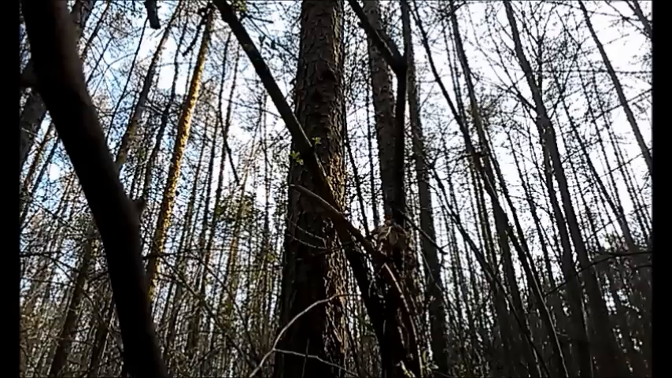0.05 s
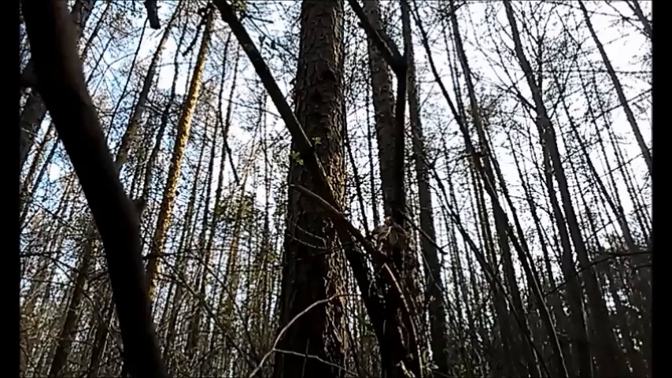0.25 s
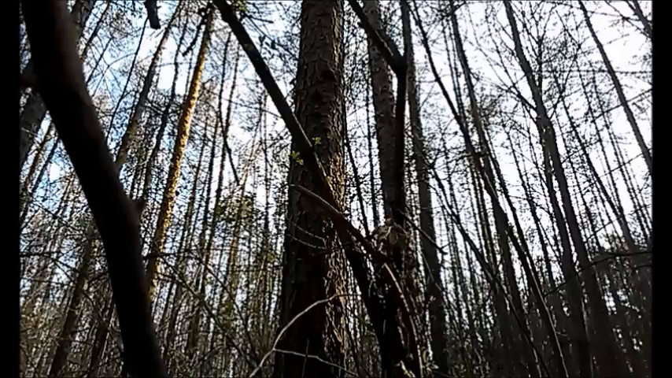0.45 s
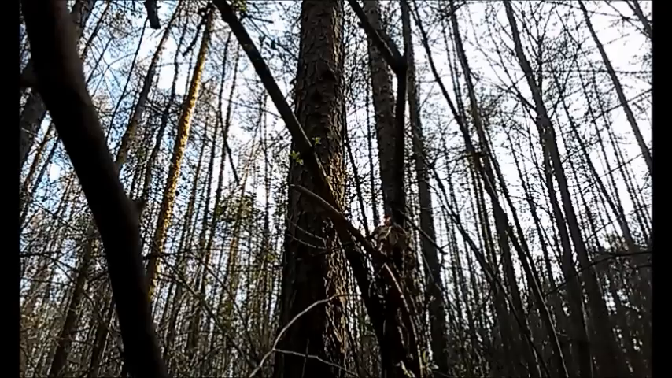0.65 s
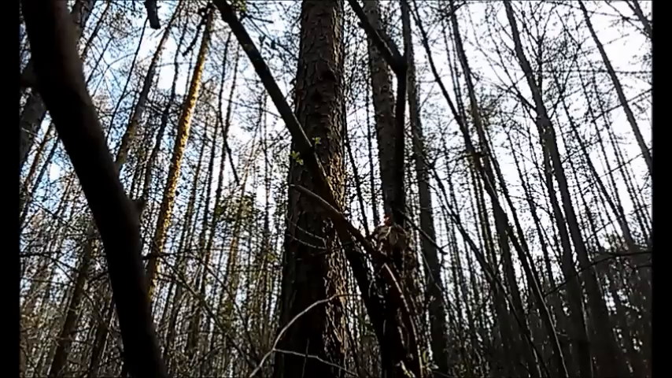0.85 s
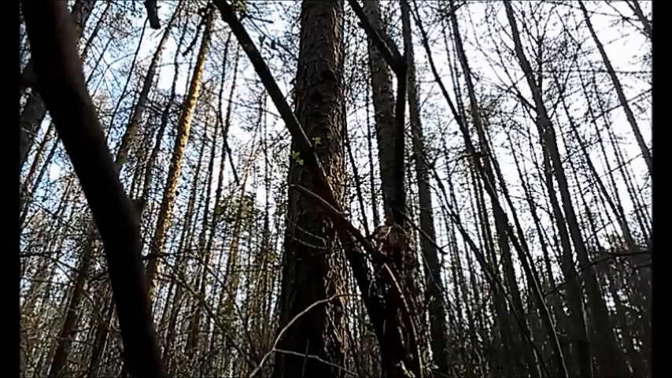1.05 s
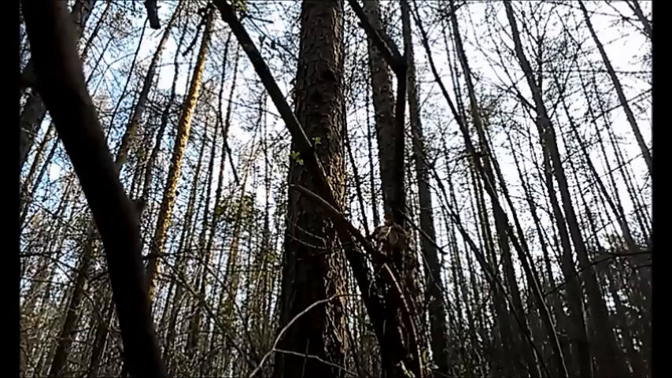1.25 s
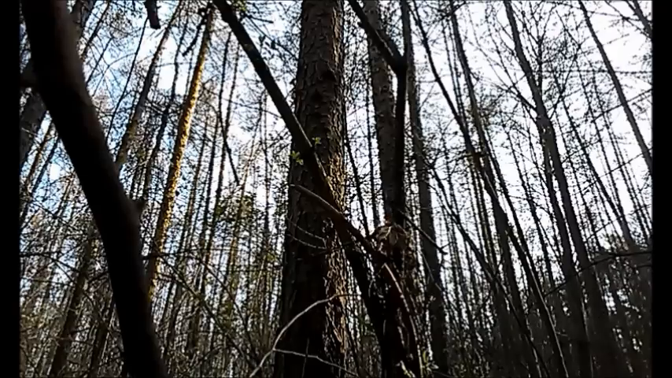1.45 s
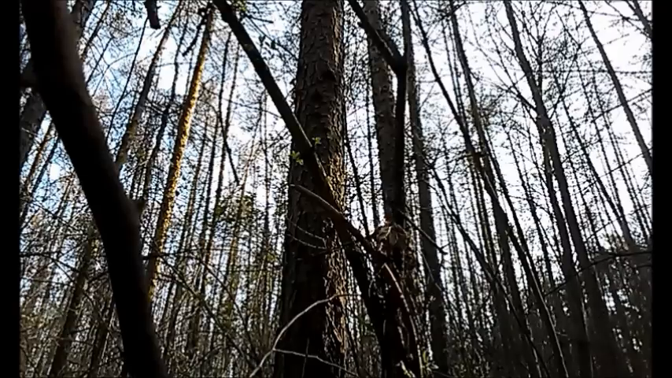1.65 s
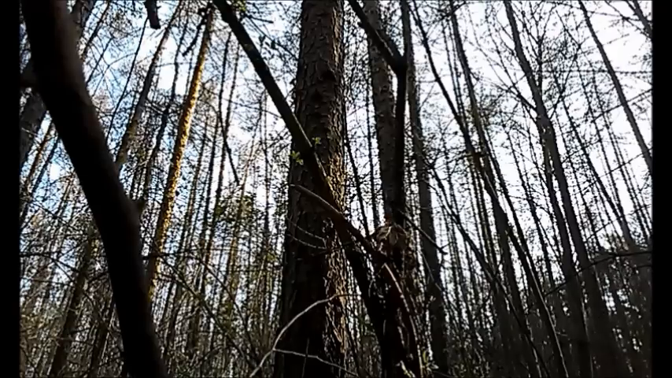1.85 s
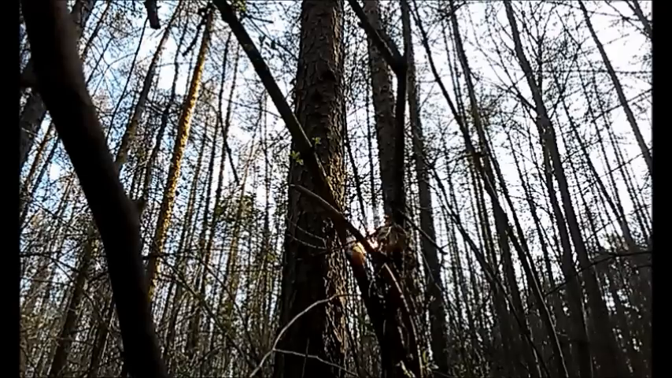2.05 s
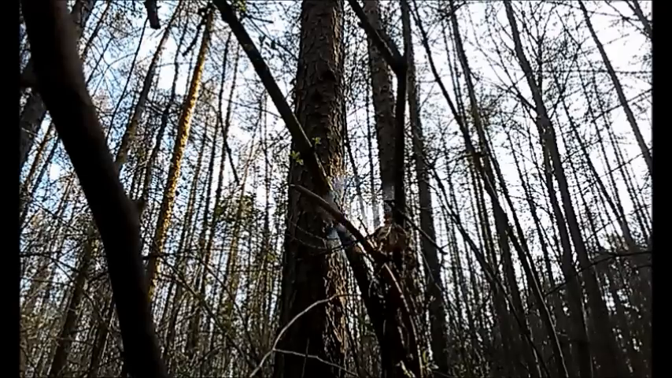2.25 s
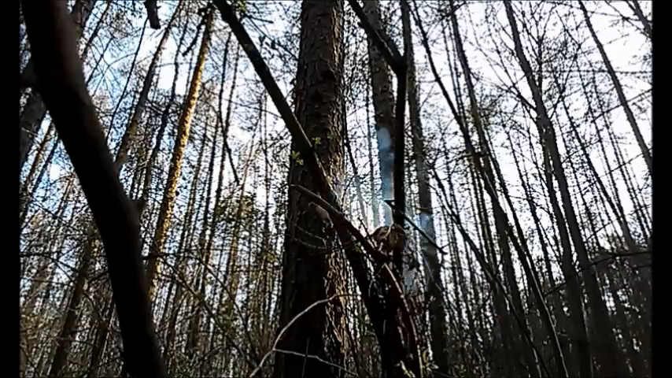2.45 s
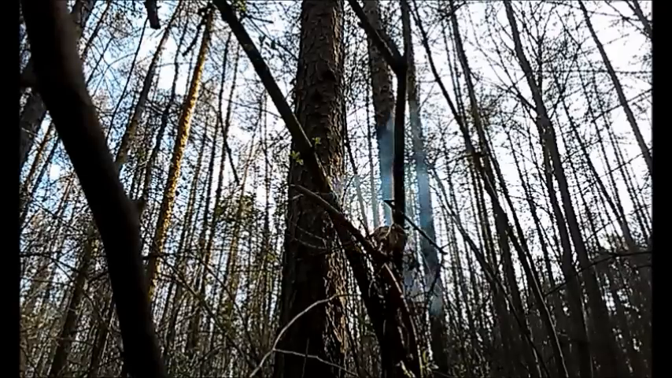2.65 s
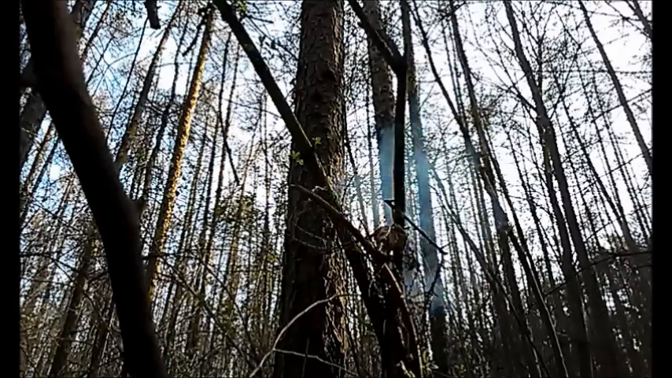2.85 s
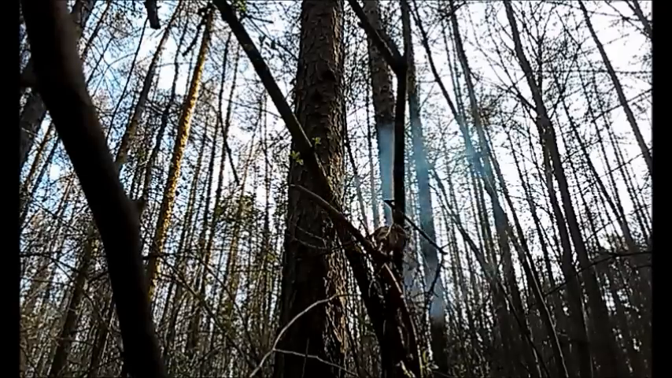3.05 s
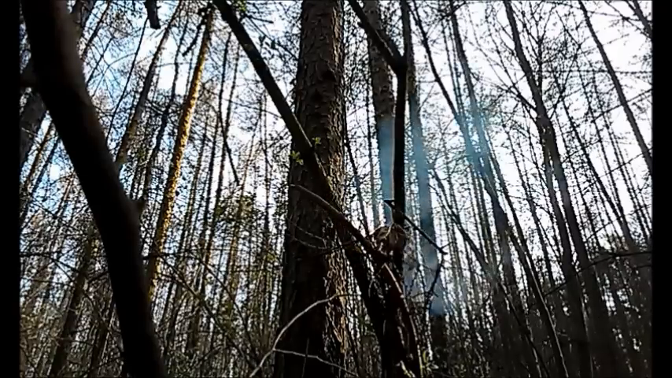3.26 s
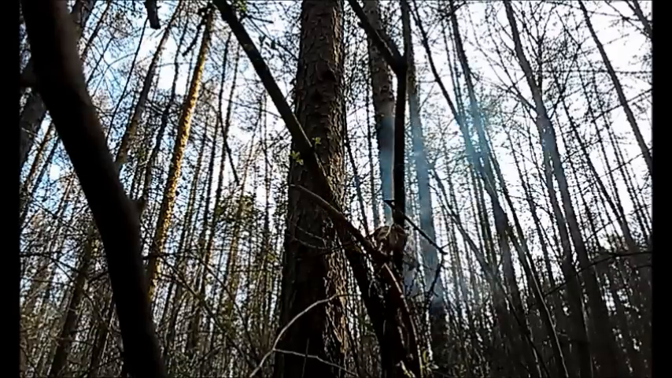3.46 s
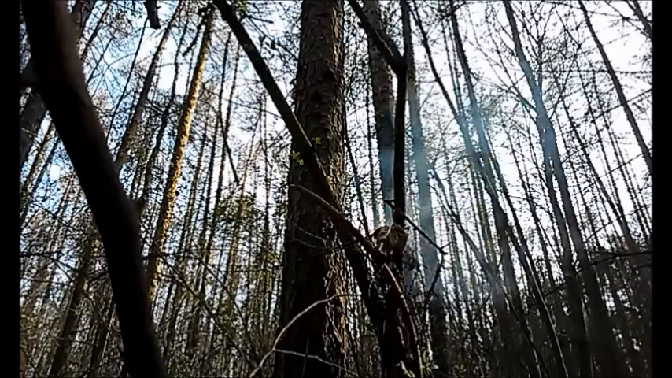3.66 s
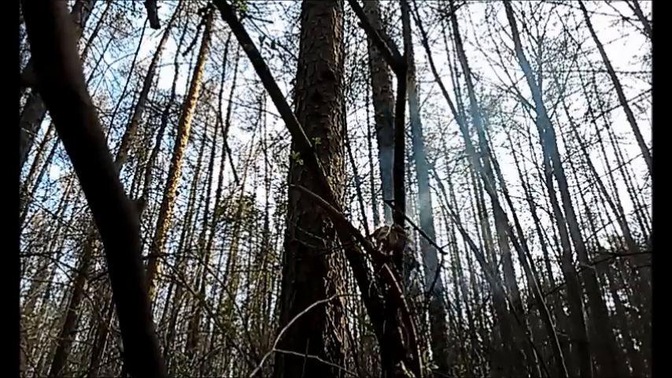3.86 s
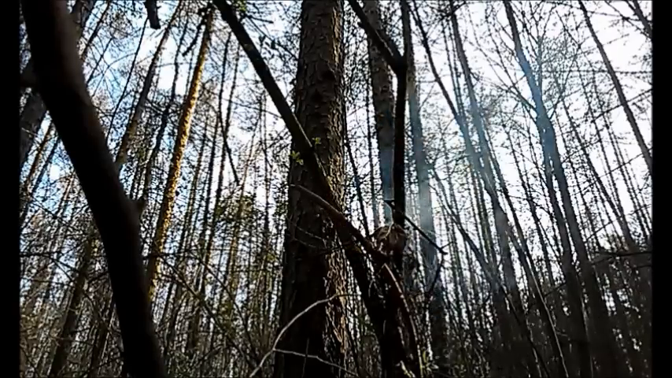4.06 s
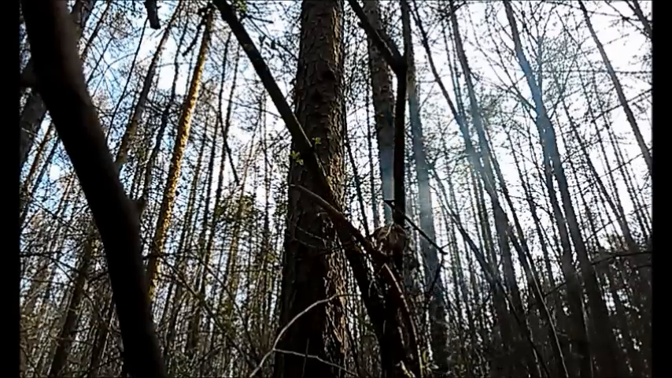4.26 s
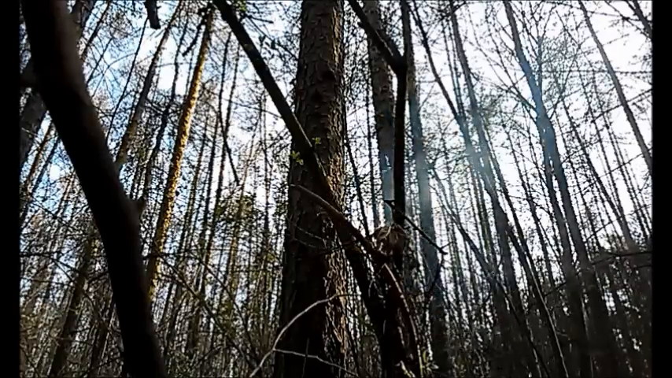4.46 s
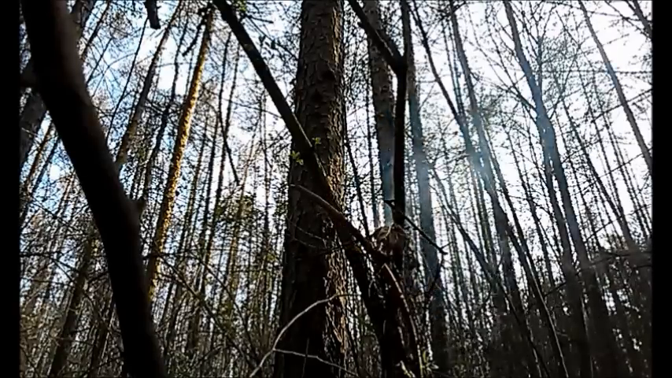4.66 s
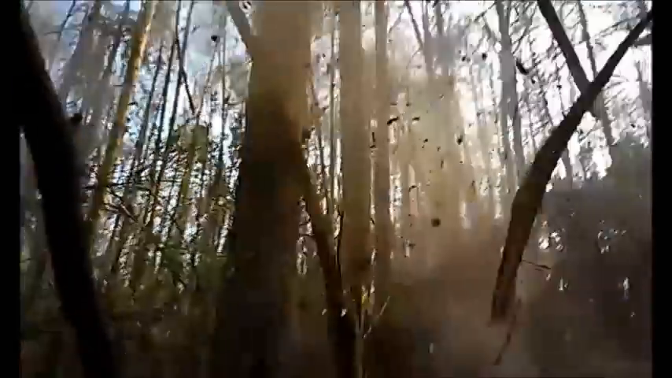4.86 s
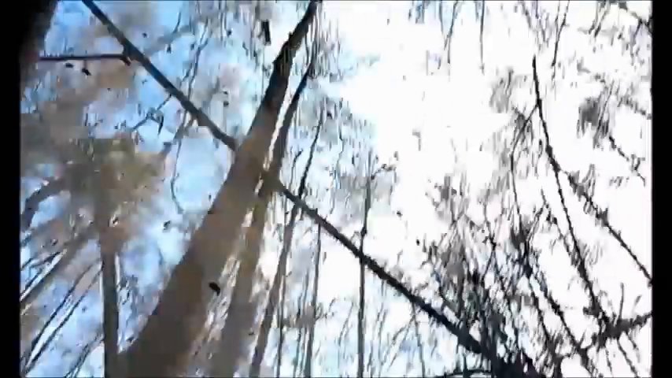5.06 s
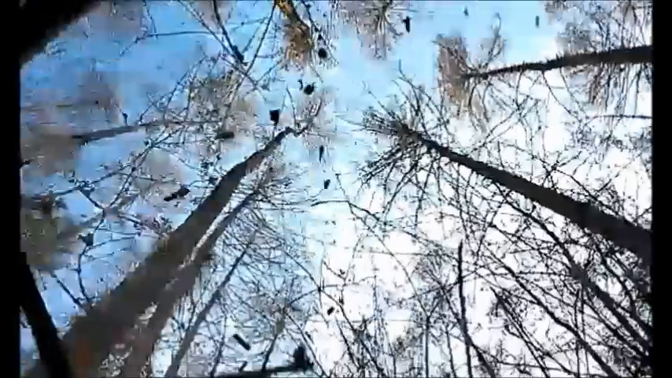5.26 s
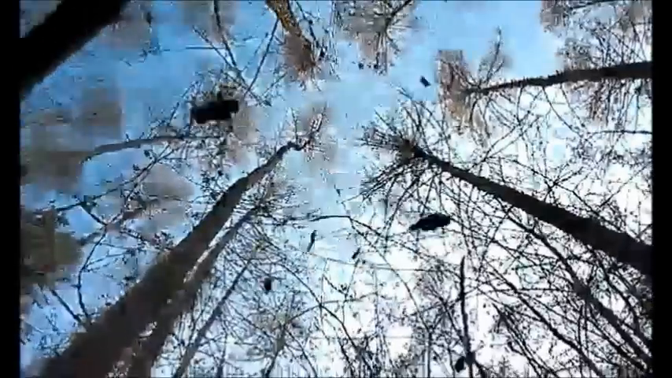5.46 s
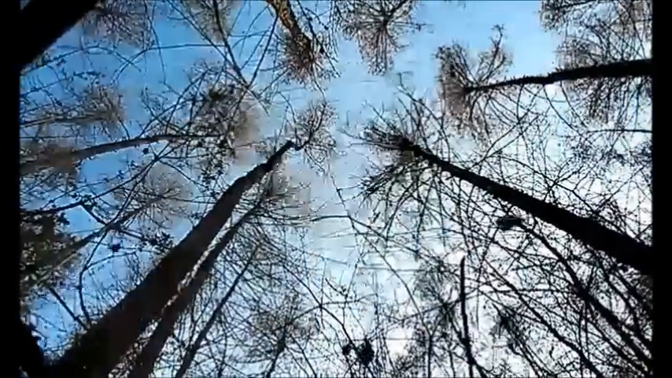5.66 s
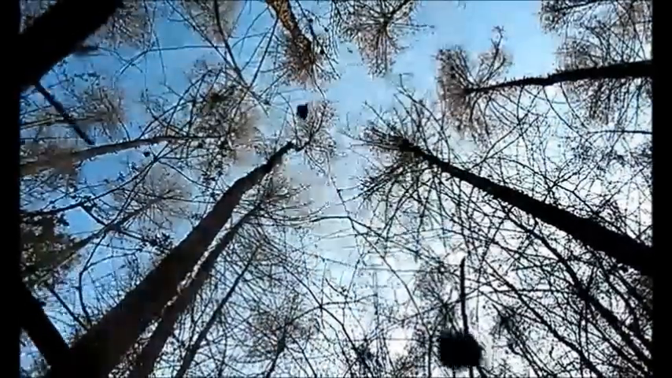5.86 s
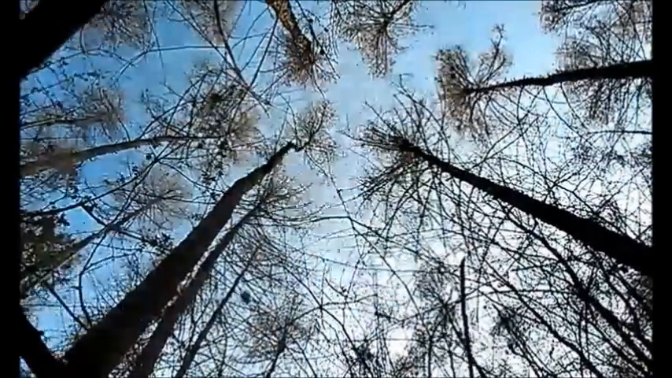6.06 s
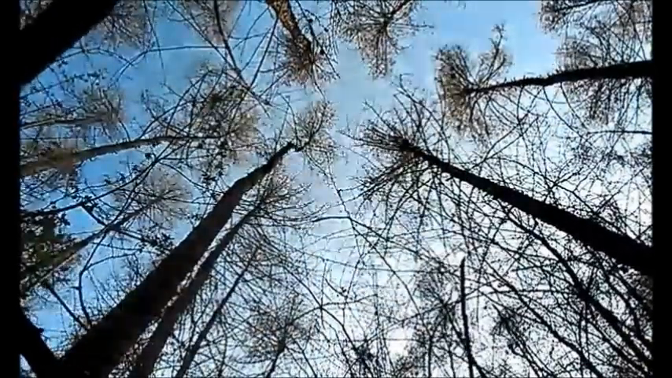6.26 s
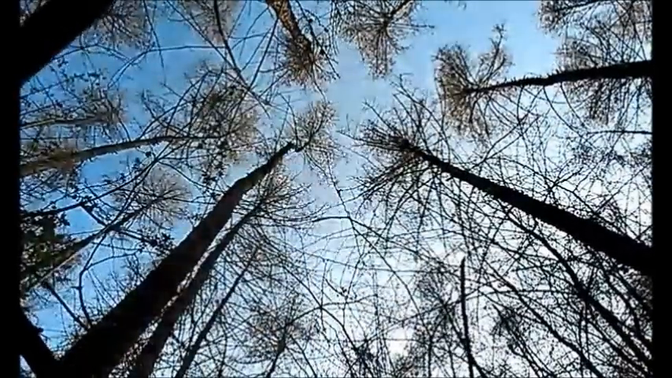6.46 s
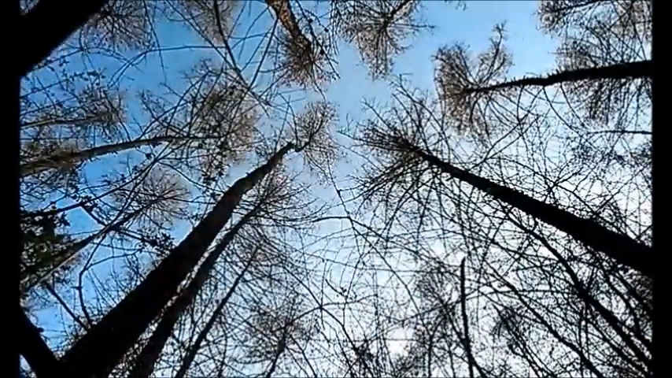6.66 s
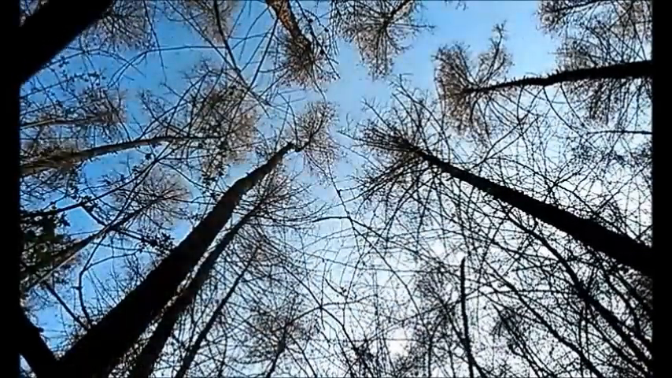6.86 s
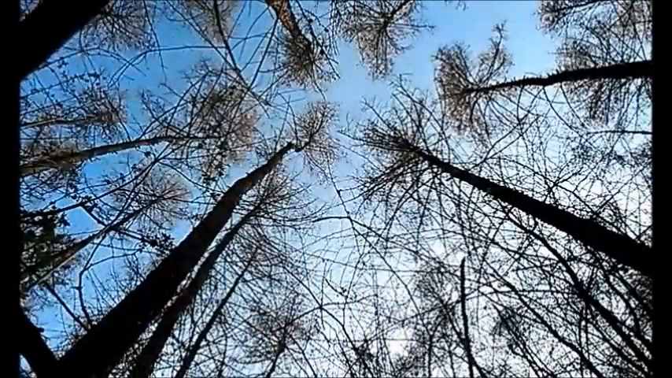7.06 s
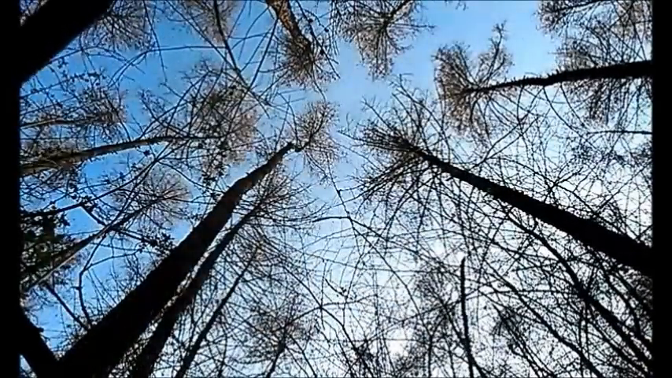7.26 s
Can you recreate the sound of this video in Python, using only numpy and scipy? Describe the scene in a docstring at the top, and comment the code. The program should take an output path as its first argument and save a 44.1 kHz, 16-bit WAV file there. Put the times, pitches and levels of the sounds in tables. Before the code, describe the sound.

In a quiet forest with faint birds, a fuse sputters and hisses, then a very loud blast overloads the microphone, echoes, and showers soil.

```python
"""Blast in a forest

Birds call faintly; a fuse sputters, catches and hisses; then a small charge overloads the microphone.
The fuse is filtered grain and noise driven by gas pressure; the blast is a pressure pulse with a crack.
Its echo is noise whose colour ages with path length, and a duller return builds up later.
Clods ring as damped modes, soil patters as random ticks, and a low hum and treetop wind lie behind."""
import sys
import numpy as np
from scipy import signal
from scipy.fft import rfft, irfft, next_fast_len
from scipy.io import wavfile
from scipy.ndimage import uniform_filter1d

SR = 44100
rng = np.random.default_rng(int(sys.argv[2]) if len(sys.argv) > 2 else 0)


def file_out(sig):
    """Save sig as 16-bit WAV at sys.argv[1]."""
    # one column per channel
    cols = np.atleast_2d(sig).T
    # limit, then scale
    lim = np.clip(cols, -1, 1)
    pcm = np.round(lim * 32767).astype(np.int16)
    wavfile.write(sys.argv[1], SR, pcm)


N = 322237
TIME = np.arange(N) / SR  # s

# the fuse catches, burns on into its casing, and sets off the charge (s)
CATCH_S, INSIDE_S, BLAST_S = 2.161, 3.11, 4.8362
# spectrum of grit and falling soil: [f/Hz, relative level per Hz/dB]
SOIL_SPECTRUM = [(1200, -20), (2500, -20), (4200, -4), (5500, -2.5), (7000, -1.5), (8500, -3.5),
                 (11000, -5.5), (16000, -10)]
# clods and twigs landing near by: [t/s, initial level/dB, centre f/Hz, decay time/s]
CLOD_LANDINGS = [(5.1995, -13, 9600, .0008), (5.3205, -8, 8000, .0013), (5.345, -8.5, 7500, 0.0031),
                 (5.3595, -10, 6740, 0.0019), (5.4218, -14, 8000, 0.00099), (5.4448, -6, 7740, 0.002),
                 (5.5487, -1, 7200, .0005), (5.5606, -5.5, 5400, .0014), (5.5934, -8, 6700, 0.0017),
                 (5.635, -16.5, 6400, .0019), (5.6525, -18, 6900, .0017), (5.8047, -9, 6950, 0.0013),
                 (5.8385, -20, 5900, 0.0023), (5.872, -18.5, 3300, 0.0016), (5.9128, -17, 3000, 0.003),
                 (5.9652, -9, 11500, 0.00036), (5.972, -25.5, 7750, .0018), (6.05, -32, 6400, 0.0018),
                 (6.0823, -25.5, 7700, 0.0011), (6.1872, -26, 7200, 0.0041), (6.2357, -32, 6530, 0.0027),
                 (6.392, -24, 6100, 0.0017), (6.468, -14.5, 8650, .0006), (6.474, -20, 9100, 0.0013),
                 (6.4763, -15, 6700, 0.00044), (6.5365, -33, 8000, 0.0011), (6.6165, -39, 7800, 0.0051),
                 (6.719, -42.5, 6500, 0.0068), (7.151, -39, 8060, 0.0014), (7.2075, -36, 4700, .002)]


def gain_of(db):
    """Converts a level to an amplitude ratio: 20 dB is a factor of ten."""
    return 10 ** (np.asarray(db) / 20)


def evened(x):
    """Normalizes the mean power, giving an rms of one."""
    return x / np.sqrt(np.mean(x ** 2) + 1e-20)


def read(points, hz):
    """Interpolates a spectrum on a logarithmic frequency axis."""
    f, value = np.transpose(points)
    return np.interp(np.log(hz + 1), np.log(f + 1), value)


def level(rows):
    """Interpolates a level curve linearly in dB and returns its gain over time."""
    return gain_of(np.interp(TIME, *np.transpose(rows)))


def swell(s, width_s):
    """Gaussian envelope of height one around time s."""
    return np.exp(-((TIME - s) / width_s) ** 2)


def ramp(s, rise_s):
    """Linear onset from zero at time s to one, then constant."""
    return np.clip((TIME - s) / rise_s, 0, 1)


def add(mix, s, sound):
    """Superposes a sound on the mix from time s."""
    part = mix[max(round(s * SR), 0):][:len(sound)]
    part += sound[:len(part)]


def noise():
    """White noise: equal mean power at every frequency."""
    return rng.standard_normal(N)


def slow_noise(first_samples, second_samples):
    """Low-frequency fluctuation of unit rms: white noise through two moving averages."""
    return evened(uniform_filter1d(uniform_filter1d(noise(), first_samples), second_samples))


def coloured(x, spectrum, peaks=()):
    """Filters x by a broad spectrum with resonant peaks and dips, then sets its rms to one."""
    size = next_fast_len(len(x))
    hz = np.fft.rfftfreq(size, 1 / SR)
    db = read(spectrum, hz)
    for centre_hz, width_hz, peak_db in peaks:
        db = db + peak_db / (1 + (2 * (hz - centre_hz) / width_hz) ** 2)
    return evened(irfft(rfft(x, size) * gain_of(db), size)[:len(x)])


def grains(per_s, spread_db):
    """Random impulses of either sign with exponentially distributed levels: many small, few large."""
    size = gain_of(spread_db * np.minimum(rng.exponential(1, N), 4))
    sign = rng.choice([-1, 1], N)
    return evened(size * sign * (rng.random(N) < per_s / SR))


def scatter(x, t60, wet_db):
    """Diffuse reverberation from ground and trunks: noise that decays by 60 dB in t60 seconds."""
    t = np.arange(SR) / SR
    tail = rng.standard_normal(SR) * gain_of(-60 * t / t60)
    wet = signal.fftconvolve(x, tail / np.linalg.norm(tail))[:N]
    return x + gain_of(wet_db) * wet


def shock(push_db=18, push_s=0.0048, crack_db=22, crack_s=0.015):
    """Blast wave: overpressure decays through zero into suction, with a decaying crack of thrown grit."""
    age = np.maximum(TIME - BLAST_S, 0)
    push = gain_of(push_db) * (1 - age / push_s) * np.exp(-age / push_s)
    crack = gain_of(crack_db) * np.exp(-age / crack_s) * coloured(noise(), SOIL_SPECTRUM)
    return (push + crack) * (TIME >= BLAST_S)


def echo(first_path_s=0.13, lumps_db=1.34, start_db=18.5, spread_s=0.11, loss_db_per_s=22):
    """Scattering by trunks: longer paths are weaker; upper bass and 7 kHz fade, deepest bass gains share."""
    # spectrum at a path of one second: [f/Hz, relative level per Hz/dB]
    path_spectrum = [(30, -43), (100, -19), (170, -24.5), (300, -10), (480, -1), (640, -3.5), (780, -9),
                     (1020, -5), (1350, -15), (1650, -12.5), (2100, -21), (2700, -21.5), (4000, -32),
                     (8000, -38.5), (16000, -61.5)]
    # change of colour for each doubling of the path: [f/Hz, relative level/dB]
    path_ageing = [(40, 7), (150, -6), (450, 1.5), (1000, 2), (2500, -1.5), (7000, -6.5), (16000, 1.5)]
    # stronger returns from dense stands of trees: [t/s, lift/dB, width/s]
    stand_returns = [(4.98, 14, 0.087), (5.53, 5, 0.11), (5.96, 2, 0.048), (6.33, 2, .1)]
    hz, t, z = signal.stft(noise(), SR, nperseg=1024, noverlap=768)
    doublings = np.log2(np.maximum(t - BLAST_S, 0) + first_path_s)
    colour_db = read(path_spectrum, hz)[:, None] + read(path_ageing, hz)[:, None] * doublings
    colour = gain_of(colour_db)
    colour /= np.sqrt(np.mean(colour ** 2, axis=0))  # only the colour changes here, not the level
    roll = signal.istft(z * colour, SR, nperseg=1024, noverlap=768)[1][:N]
    age = np.maximum(TIME - BLAST_S, 0)
    db = start_db - loss_db_per_s * age  # loss among the trunks
    db += lumps_db * slow_noise(700, 300)  # trees stand in groups
    for s, lift_db, width_s in stand_returns:
        db += lift_db * swell(s, width_s)
    spreading = 1 / (1 + age / spread_s)  # the path doubles after spread_s
    return roll * gain_of(db) * spreading * (TIME >= BLAST_S)


def rumble(db=-45, delay_s=1.0, rise_s=0.78):
    """Late reflection: far slopes return mainly the low frequencies, which rise and then stay."""
    # the dull return: [f/Hz, relative level per Hz/dB]
    rumble_spectrum = [(25, -3), (70, -1.5), (120, -8.5), (190, -11), (290, -3.5), (430, 1.5), (620, -3),
                       (1000, -8), (1600, -18.5), (4000, -36)]
    return gain_of(db) * ramp(BLAST_S + delay_s, rise_s) * coloured(noise(), rumble_spectrum)


def fuse(hiss_db=-44.0, flame_db=-51.0, fizz_db=-48.0, inside_hiss_db=-6, inside_flame_db=-3,
         open_fizz_db=-11, creep_s=0.52, flame_follow=.35, fizz_follow=1.42, flutter_db=0.36,
         sputter_s=0.0064):
    """Jet and combustion noise follow gas pressure; inside the casing hiss weakens and fizz grows."""
    # jet hiss, flame roar and thin fizz of sparks: [f/Hz, relative level per Hz/dB]
    hiss_spectrum = [(1180, -13), (2000, -10.5), (2200, -12), (2590, -12), (2980, -28), (3730, -9),
                     (4060, -8.5), (4240, -7.5), (5130, -5), (6370, -4.5), (7450, -11), (11300, -11.5),
                     (12300, -18), (14200, -15), (15800, -24)]
    flame_spectrum = [(53, -39), (90, -8), (123, -1), (166, -11), (294, -6), (333, -2.5), (384, -6.5),
                      (819, -2), (958, -5), (1290, 1), (1610, -9.5), (2180, 0), (2760, -9), (3900, -6.5),
                      (5070, -40), (8580, -120)]
    fizz_spectrum = [(3500, -11), (5000, 0), (6900, 0.5), (8300, 3.5), (10500, -0.5), (11900, -10),
                     (12800, 6), (13900, 2), (14700, 0), (16000, -60.5)]
    # narrow resonances of the casing, and peaks in the fizz: [f/Hz, width/Hz, relative level/dB]
    casing_modes = [(1340, 270, -0.5), (2196, 320, -13.5), (2630, 210, 2), (4020, 140, -13), (5280, 470, 4),
                    (6320, 210, 6), (6940, 190, 5), (7500, 200, 3.5), (7770, 150, 7.5), (8480, 200, 6)]
    fizz_peaks = [(5560, 190, 5), (5950, 250, -7), (6280, 210, 7), (6600, 180, -5), (7000, 110, 19.5),
                  (7090, 230, -8), (7720, 240, 6), (8060, 200, -4.5), (8100, 160, 10), (9300, 200, 3.5)]
    # sputters as the fuse catches: [t/s, level/dB]
    sputter_times = [(1.974, -65), (1.988, -62), (2.012, -65), (2.067, -57.5), (2.08, -61), (2.105, -63),
                     (2.133, -58), (2.151, -55.5), (2.168, -51.5)]
    # gas pressure of the burning fuse: [t/s, relative level/dB]
    pressure_curve = [(2.16, -3.5), (2.21, 2), (2.48, -2), (3.0, -1.5), (3.22, 1.5), (3.28, -3.5),
                      (3.58, -2.5), (3.89, 1), (3.92, -3), (4.02, 0.5), (4.12, -1), (4.24, 0.5),
                      (4.29, -2.5), (4.34, 0), (4.43, 2), (4.52, 8), (4.6, -4), (4.76, 1.5), (4.82, -1)]
    burning = ramp(CATCH_S, .0055) * (TIME < BLAST_S)
    inside = ramp(INSIDE_S, creep_s)
    pressure = level(pressure_curve) * gain_of(flutter_db * slow_noise(1500, 500))

    jet = gain_of(hiss_db + inside_hiss_db * inside) * pressure * burning
    for s, db in sputter_times:
        jet += gain_of(db) * swell(s, sputter_s)
    hiss = jet * coloured(grains(per_s=12000, spread_db=3.0), hiss_spectrum, casing_modes)

    flame_gain = gain_of(flame_db + inside_flame_db * ramp(INSIDE_S, 0.026))
    flame = flame_gain * pressure ** flame_follow * coloured(noise(), flame_spectrum, casing_modes)

    fizz_gain = gain_of(fizz_db + open_fizz_db * (1 - inside))
    fizz = fizz_gain * pressure ** fizz_follow * coloured(noise(), fizz_spectrum, fizz_peaks)
    return hiss + burning * (flame + fizz)


def flare(db=-40.5, peak_s=2.273, width_s=0.08):
    """Combustion noise: the priming burns off in one soft puff with a Gaussian envelope."""
    # the puff of flame as the fuse catches: [f/Hz, relative level per Hz/dB]
    flare_spectrum = [(60, -25), (250, -8), (500, -2), (780, 1.5), (1200, -3), (1700, -8), (2200, -12),
                      (2800, -3.5), (4000, -18), (8000, -43)]
    puff = swell(peak_s, width_s) * ramp(CATCH_S, 0.0047)
    return gain_of(db) * puff * coloured(noise(), flare_spectrum)


def clods(below_db=-10, above_db=-10, dulling_db=-6, ring_db=6, ring_width=0.17,
          body_ratio=0.687, body_width=0.062, body_db=6, rise_s=.0001):
    """Impact excitation: dry snaps ring at a main and a lower body mode; longer contacts are duller."""
    out, t = np.zeros(N), np.arange(2048) / SR
    for s, db, hz, decay in CLOD_LANDINGS:
        top_db = above_db + dulling_db * np.log2(decay / 0.00093)  # dulling per doubling of the decay
        spectrum = [(hz / 10, below_db - 4), (hz / 2, below_db), (hz, 0), (hz * 2, top_db)]
        # widths are fractions of the main mode's frequency
        modes = [(hz, ring_width * hz, ring_db), (body_ratio * hz, body_width * hz, body_db)]
        snap = coloured(rng.standard_normal(len(t)), spectrum, modes)
        fade = np.exp(-t / decay) * (1 - np.exp(-t / rise_s))
        decay_rms = np.sqrt(np.mean(np.exp(-2 * t / decay)))  # a longer decay carries more energy
        add(out, s, gain_of(db) * evened(snap * fade) * decay_rms)
    return scatter(out, t60=.15, wet_db=-15)


def shower(per_s=90, spread_db=4.6, clump_db=2, skirt_db=-13, spray_db=-19, spray_s=0.036, count=16,
           first_s=5.35, rain_db=-39, thinning_db_per_s=12):
    """Random impacts on dry leaves: each leaf size ticks in a narrow band, thickest around each clod."""
    patter = np.zeros(N)
    t = np.arange(1024) / SR
    for hz in np.geomspace(2300, 14500, count):
        band = [(hz / 4, skirt_db + 4), (hz * 0.46, skirt_db), (hz, 0), (hz / 0.75, skirt_db)]
        leaf = coloured(rng.standard_normal(len(t)), band)
        tick = evened(leaf * np.exp(-t / 0.0016))
        patter += np.sqrt(hz) * signal.oaconvolve(grains(per_s, spread_db), tick)[:N]
    patter = scatter(patter * gain_of(clump_db * slow_noise(500, 200)), t60=0.064, wet_db=-3.5)
    rain = gain_of(rain_db - thinning_db_per_s * (TIME - first_s)) * ramp(first_s, .1)
    spray_power = np.zeros(N)
    for s, db, hz, decay in CLOD_LANDINGS:
        # soft clods, with their longer contact, shed more soil
        spray_power += (gain_of(db + spray_db) * decay / .003 * swell(s, spray_s)) ** 2
    return coloured(patter, SOIL_SPECTRUM) * np.sqrt(rain ** 2 + spray_power)


def hum(db=-63.5, start_s=3.52, rise_s=.2, end_s=4.2, fall_s=0.11, waver=0.014):
    """Common frequency modulation: two low partials drift together as they swell and go."""
    # faint low partials: [f/Hz, relative level/dB]
    hum_partials = [(116, 2), (170, -3)]
    drift = 1 + waver * evened(uniform_filter1d(noise(), 4000))
    warped_s = np.cumsum(drift) / SR
    tone = np.zeros(N)
    for hz, part_db in hum_partials:
        tone += gain_of(part_db) * np.sin(2 * np.pi * hz * warped_s)
    return gain_of(db) * (ramp(start_s, rise_s) - ramp(end_s, fall_s)) * evened(tone)


def birds(waver=0.0154, warble=1.0, db=-4):
    """Modulated sines: far whistles and one quick rustle warble, bend late and blur by reverberation."""
    # bird notes, and one quick falling rustle at 0.026 s:
    # [t/s, length/s, start f/Hz, end f/Hz, relative level/dB]
    whistles_and_rustle = [(0, 0.059, 7680, 7900, -60), (0.026, .024, 6750, 3340, -61),
                           (.05, .14, 8900, 8960, -71), (.135, 0.075, 6140, 5650, -70),
                           (0.218, 0.036, 4850, 3460, -60), (0.289, .04, 4470, 3530, -59),
                           (.293, 0.061, 6160, 5500, -66), (0.396, .15, 4950, 4380, -70),
                           (1.034, 0.048, 6460, 6330, -72), (1.708, .07, 7750, 7950, -71)]
    out = np.zeros(N)
    for s, length, start_hz, end_hz, sound_db in whistles_and_rustle:
        u = np.linspace(0, 1, int(length * SR))
        slow = evened(uniform_filter1d(rng.standard_normal((2, SR)), 200))
        wobble, flutter = slow[:, :len(u)]
        hz = (start_hz + (end_hz - start_hz) * u ** 2) * (1 + waver * wobble)
        loudness = gain_of(sound_db) * (1 + warble * flutter) * signal.windows.tukey(len(u), .5)
        add(out, s, loudness * np.sin(2 * np.pi * np.cumsum(hz) / SR))
    return gain_of(db) * scatter(out, t60=0.64, wet_db=0.5)


def air(db=-58):
    """Stationary broadband noise: a low, steady wash of wind in far treetops."""
    # still forest air: [f/Hz, relative level per Hz/dB]
    air_spectrum = [(15, -14), (28, 4), (72, 3), (100, -6), (220, -8.5), (310, -9), (390, -9.5), (600, -11),
                    (980, -8.5), (1400, -16), (2000, -23), (6700, -30.5), (15500, -32)]
    return gain_of(db) * coloured(noise(), air_spectrum)


def scene():
    """Superposition of blast, fuse, debris and forest at one microphone."""
    blast = shock() + echo() + rumble()
    burning = fuse() + flare()
    debris = clods() + shower()
    background = hum() + birds() + air()
    return (blast + burning + debris + background)[None]


def record(dry, ceiling_db=-3, limit_db=-14.5, recovery_db_per_s=60, attack_s=0.0046, low_cut_hz=45,
           presence=0.38, edge_hz=15900):
    """Saturation and compression: clipping flattens peaks, filters tilt them, gain control cuts them."""
    ceiling = gain_of(ceiling_db)
    fine = signal.resample_poly(dry[0], 2, 1)  # clipping at twice the rate lessens aliasing
    clipped = signal.resample_poly(np.clip(fine, -ceiling, ceiling), 1, 2)
    toned = signal.lfilter(*signal.butter(1, low_cut_hz, "high", fs=SR), clipped)
    toned = toned + presence * signal.lfilter(*signal.butter(1, [5500, 8500], "band", fs=SR), toned)

    keep = np.exp(-1 / (attack_s * SR))
    power = signal.lfilter([1 - keep], [1, -keep], toned ** 2)
    power_db = 10 * np.log10(power + 1e-12)
    # the running maximum holds each peak, then lets it fall at the recovery rate
    fall_db = TIME * recovery_db_per_s
    held_db = np.maximum.accumulate(power_db + fall_db) - fall_db
    over_db = np.maximum(held_db - limit_db, 0)
    lead = 30  # samples: the gain acts a moment ahead of the sound
    over_db = np.pad(over_db[lead:], (0, lead), "edge")
    limited = np.clip(toned / gain_of(over_db), -.66, .66)
    edge = signal.firwin(511, edge_hz, window=("kaiser", 9), fs=SR)  # low-pass
    return signal.oaconvolve(limited, edge, "same")[None]


dry = scene()
out = record(dry)
file_out(out)
```